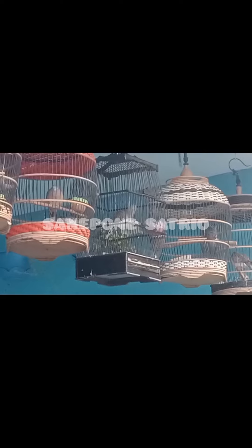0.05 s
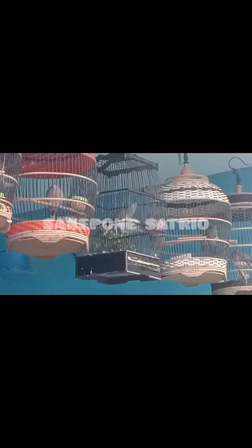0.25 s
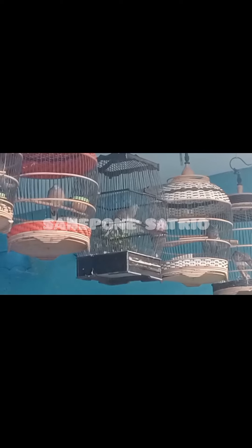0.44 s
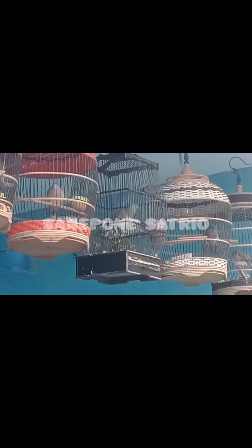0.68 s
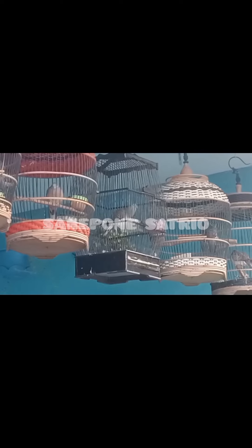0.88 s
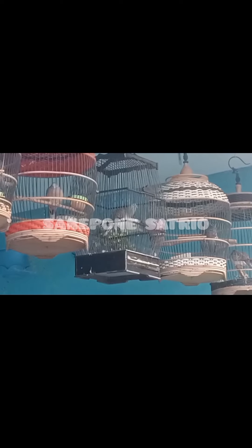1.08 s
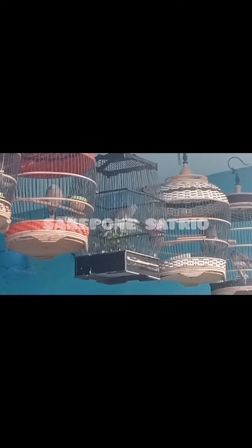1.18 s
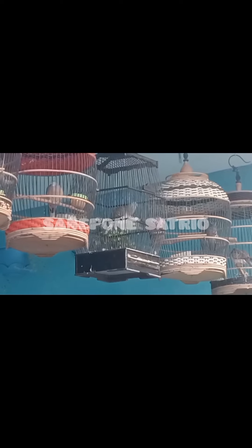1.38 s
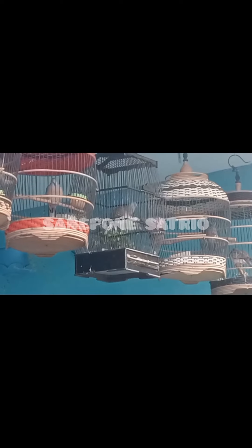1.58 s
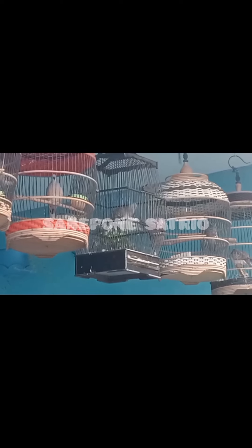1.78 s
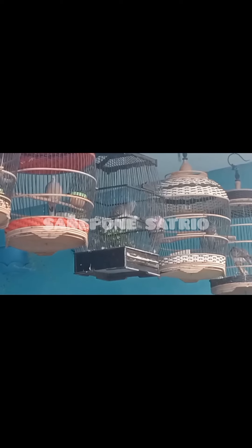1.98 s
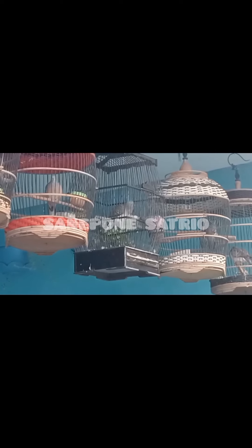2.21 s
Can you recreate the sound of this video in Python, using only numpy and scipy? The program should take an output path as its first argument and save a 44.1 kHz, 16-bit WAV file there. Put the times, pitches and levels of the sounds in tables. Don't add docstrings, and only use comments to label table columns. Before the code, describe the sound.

A bright claw tick opens at 0 s. From 0.2 to 0.95 s a caged dove sings a rapid phrase of about nine pure, fluty notes near 1200 Hz, scooped from below; the last are faint. Walls echo it. Soft low hoots from farther doves continue underneath. Faint, reverberant sparrow chirps come near 0, 1 and 2 s; a tick at 1.2 s, slight feather rustles, steady air hiss, low traffic hum.

```python
import sys
import numpy as np
from scipy import signal
from scipy.io import wavfile

SR = 44100
rng = np.random.default_rng(int(sys.argv[2]) if len(sys.argv) > 2 else 0)


def unload_audio(sound):
    columns = np.transpose(np.atleast_2d(sound))
    steps = np.round(np.clip(columns, -1, 1) * 32767)
    wavfile.write(sys.argv[1], SR, steps.astype(np.int16))


def volts(x):
    e = np.asarray(x, float) / 20
    return 10 ** e


N = 99225

# frequency in Hz, density in dB per Hz.
AIR_SPECTRUM = [(220, -51), (380, -1.5), (764, -6), (838, -15), (935, -9), (1690, -7), (4690, -15),
                (7590, -12), (15500, -33)]
# frequency in Hz, density in dB per Hz.
TRAFFIC_SPECTRUM = [(15, -67), (25, -11), (130, 1), (270, -8.5), (332, -2), (360, -16.5), (400, -20),
                    (520, -67), (880, -120)]
# start in seconds, peak level in dB.
PERCH_TICKS = [
    (.0031, -22.5),
    (.7705, -49.5),
    (1.1715, -29),
    (1.254, -44),
]
# middle in seconds, length in seconds, level in dB,
# low edge in Hz, high edge in Hz.
FEATHER_RUSTLES = [(.01, 0.035, -60, 3300, 8600), (0.19, 0.029, -51.5, 980, 1650),
                   (0.381, 0.037, -56.5, 1300, 1700), (0.802, 0.088, -69, 8140, 8700),
                   (.92, 0.44, -65, 7140, 7620), (1.037, 0.081, -65.5, 4870, 6400),
                   (1, 0.057, -70, 6500, 15000), (1.34, .03, -75, 9920, 14900),
                   (1.423, 0.057, -61.5, 1570, 2130), (2.028, 0.097, -64, 1350, 1840),
                   (2.043, 0.11, -56.5, 4650, 9300), (0, 0.091, -76, 9000, 14000),
                   (2.164, 0.16, -70, 6960, 7500), (2.24, .04, -58.5, 4167, 10000)]
# start in seconds, length in seconds, first pitch in Hz, last pitch in Hz, level in dB.
FAR_HOOTS = [(0.192, 0.078, 590, 606, -54), (0.369, 0.042, 600, 607, -66), (.51, 0.045, 630, 698, -58.5),
             (0.598, .2, 603, 595.2, -56.5), (.82, 0.059, 660, 634, -64.5), (0.861, 0.113, 598, 618, -57),
             (0.999, 0.054, 660, 650, -60), (1.063, 0.061, 615, 603, -54.5), (1.159, 0.17, 560, 546.4, -59),
             (1.343, 0.086, 595, 610, -58.5), (1.129, 0.165, 366, 359.7, -64),
             (0.835, 0.054, 480, 487, -57.5), (1.004, 0.062, 475, 499, -61.5),
             (2.219, 0.081, 610, 596, -60)]
# start in seconds, level in dB.
SPARROW_CHIRPS = [
    (-.07, -62),
    (1.02, -59),
    (1.986, -58.5),
]
# start in seconds, length in seconds, peak pitch in Hz, level in dB,
# place of the peak from 0 to 1.
WHISTLES = [
    (0.207, 0.11, 1270, -26.5, 0.57),
    (.343, 0.035, 1202, -24.5, 0.37),
    (0.405, .03, 1177, -23, 0.8),
    (0.472, 0.024, 1161, -24, 0),
    (0.549, 0.0343, 1198, -24.5, 0.6),
    (.652, 0.083, 1211, -26, 0.3),
    (0.779, 0.0975, 1192, -30.5, 0.42),
    (0.891, 0.03, 1133, -38, .3),
    (0.927, 0.033, 1190, -42.5, 0.58),
]
# start in seconds, length
# in seconds, pitch reached in Hz, level in dB.
LOW_SCOOPS = [(0.191, 0.034, 965, -29.5), (0.297, .036, 1225, -27), (0.365, 0.056, 970, -33),
              (0.397, 0.025, 990, -31), (0.437, 0.012, 1200, -25), (0.442, 0.012, 960, -39.5),
              (0.465, .02, 975, -37.5), (0.496, 0.046, 1080, -29.5), (0.537, 0.035, 985, -35.5),
              (0.634, 0.027, 975, -31), (.753, 0.019, 985, -30.5), (.781, 0.033, 990, -39),
              (0.876, 0.068, 1050, -45.5), (0.93, 0.037, 1060, -53.5)]
# multiple of the pitch, level in dB.
WHISTLE_OVERTONES = [(3, -58), (4, -38), (5, -44), (5.5, -48.5), (7, -48), (9, -57), (10, -57)]
# centre in Hz, width in Hz, gain in dB.
BEAK_RESONANCES = [(3800, 90, 18), (4626, 90, 7.5), (5960, 240, 3), (11540, 130, 10.5)]


def rms_one(x):
    return x / np.sqrt(np.mean(x ** 2) + 1e-20)


def drift(rate_hz):
    r = np.exp(-80 * np.pi * rate_hz / SR)
    white = rng.standard_normal(N // 40 + 2002)
    slow = signal.lfilter([1], [1, -2 * r, r * r], white)[2000:]
    return np.interp(np.arange(N) / 40, np.arange(len(slow)), rms_one(slow))


def gate(start_s, length_s, attack_s, release_s):
    t = np.arange(N) / SR - start_s
    rise = np.clip(np.minimum(t / attack_s, (length_s - t) / release_s), 0, 1)
    return np.sin(rise * np.pi / 2) ** 2, t


def tone(hz, multiple=1):
    return np.sqrt(2) * np.sin(2 * np.pi * multiple * np.cumsum(hz) / SR)


def band(x, low_hz, high_hz):
    edges_hz = [low_hz, min(high_hz, 0.45 * SR)]
    return signal.sosfilt(signal.butter(2, edges_hz, "band", fs=SR, output="sos"), x)


def top_cut(x):
    return signal.sosfilt(signal.ellip(10, 0.5, 60, 15600, fs=SR, output="sos"), x)


def coloured(spectrum, patchy_db):
    hz, db = np.transpose(spectrum)
    white = rng.standard_normal((2, N + SR))
    edges_hz = 25 * 2 ** np.arange(0, 9.5, 1 / 3)
    out = 0
    for k, (low_hz, high_hz) in enumerate(zip(edges_hz, edges_hz[1:])):
        level_db = np.interp(np.log(low_hz * high_hz) / 2, np.log(hz), db, left=-90)
        flicker_db = patchy_db * drift(8.2)
        out = out + volts(level_db + flicker_db) * band(white[k % 2], low_hz, high_hz)[SR:]
    return rms_one(out)


def yard(x, wet_db, decay_share=1):
    early_db, early_t60_s, late_t60_s, wall_cut_hz = 12, 0.5, 0.89, 6600
    t = np.arange(SR) / SR
    early = volts(early_db - 60 * t / early_t60_s)
    late = volts(-60 * t / late_t60_s)
    decay = (early + late) ** (1 / decay_share)
    echo = rng.standard_normal(SR) * decay * (t > 0.004)
    echo = echo / np.sqrt(np.sum(echo ** 2))
    dull = np.exp(-2 * np.pi * wall_cut_hz / SR)
    echo = signal.lfilter([1 - dull], [1, -dull], echo)
    return x + volts(wet_db) * signal.fftconvolve(x, echo)[:N]


def background():
    air_db, traffic_db, insect_db = -57.5, -54.5, -85
    air = volts(air_db) * coloured(AIR_SPECTRUM, patchy_db=0.8)
    traffic = volts(traffic_db) * coloured(TRAFFIC_SPECTRUM, patchy_db=3.5)
    insects = volts(insect_db) * rms_one(band(rng.standard_normal(N), 13250, 13750))
    low_cut = signal.butter(2, 68, "high", fs=SR, output="sos")
    return top_cut(signal.sosfilt(low_cut, air + traffic + insects))


def perch_ticks():
    t60_s, top_db = 0.0044, -3
    white, t = rng.standard_normal(N), np.arange(N) / SR
    bursts = np.full(N, 1e-18)
    for start_s, db in PERCH_TICKS:
        decay_db = -60 * np.maximum(t - start_s, 0) / t60_s
        bursts = bursts + volts(db + decay_db) * (t >= start_s) * white
    return band(bursts, 3950, 10000) + volts(top_db) * band(bursts, 14000, 16400)


def feather_rustles():
    white, t = top_cut(rng.standard_normal(N)), np.arange(N) / SR
    out = 0
    for middle_s, length_s, db, low_hz, high_hz in FEATHER_RUSTLES:
        swell = np.exp(-(2 * (t - middle_s) / length_s) ** 4)
        out = out + volts(db) * swell * rms_one(band(white, low_hz, high_hz))
    return out


def far_doves():
    edge_s, wet_db = 0.014, -1
    out = 0
    for start_s, length_s, first_hz, last_hz, db in FAR_HOOTS:
        shape, t = gate(start_s, length_s, edge_s, edge_s)
        hz = first_hz + (last_hz - first_hz) * np.clip(t / length_s, 0, 1)
        out = out + volts(db) * shape * tone(hz)
    return yard(out, wet_db)


def sparrow():
    chirp_s, low_hz, swing_hz, end_drop_hz = 0.075, 3750, 650, 120
    trill_per_s, trill_hz, jitter_hz = 170, 380, 120
    wet_db, decay_share = 13, 0.7
    out = np.zeros(3 * N)
    for start_s, db in SPARROW_CHIRPS:
        shape, t = gate(0, chirp_s, 0.016, 0.035)
        u = np.clip(t / chirp_s, 0, 1)
        trill = trill_hz * np.sin(2 * np.pi * trill_per_s * t) + jitter_hz * drift(60)
        arch = np.sin(np.pi * u ** 0.605)
        hz = low_hz - end_drop_hz * u + arch * (swing_hz + trill)
        at = N + int(start_s * SR)
        out[at:at + N] += yard(volts(db) * shape * tone(hz), wet_db, decay_share)
    return out[N:2 * N]


def dove_scoops():
    edge_s, depth_hz, rise_s, throat_hz, throat_width_hz = 0.008, 304.9, 0.0061, 960, 145
    out = 0
    for start_s, length_s, top_hz, db in LOW_SCOOPS:
        shape, t = gate(start_s, length_s, edge_s, edge_s)
        hz = top_hz - depth_hz * np.exp(-np.maximum(t, 0) / rise_s)
        below = np.minimum(hz - throat_hz, 0) / throat_width_hz
        out = out + volts(db) * shape * tone(hz) / (1 + below ** 2) ** 2
    return out


def dove_whistles():
    entry_hz, exit_hz, edge_s, fade_db_per_s = 1135.4, 1119, 0.011, 16
    octave_db, flutter_db, overtone_flutter_db = -30.5, 1.5, 5
    body, bright = 0, np.zeros(N)
    flutter = volts(flutter_db * drift(47))
    overtones = [(k, db + overtone_flutter_db * drift(25)) for k, db in WHISTLE_OVERTONES]
    for start_s, length_s, peak_hz, db, place in WHISTLES:
        shape, t = gate(start_s, length_s, edge_s, edge_s)
        shape = shape * volts(-fade_db_per_s * np.clip(t, 0, length_s))
        u = np.clip(t / length_s, 0, 1) - place
        rise_hz = (peak_hz - entry_hz) * (u / max(place, 1e-9)) ** 2
        fall_hz = (peak_hz - exit_hz) * (u / (1 - place)) ** 2
        hz = peak_hz - np.where(u < 0, rise_hz, fall_hz)
        body = body + volts(db) * shape * (flutter * tone(hz) + volts(octave_db) * tone(hz, 2))
        on = shape > 0
        for multiple, level_db in overtones:
            k = round(2 * multiple) / 2
            lift_db = 0
            for at_hz, width_hz, gain_db in BEAK_RESONANCES:
                lift_db = lift_db + gain_db * np.exp(-((k * hz[on] - at_hz) / width_hz) ** 2)
            bright[on] += volts(db + level_db[on] + lift_db) * shape[on] * tone(hz[on], k)
    return body, bright


def dove():
    body, bright = dove_whistles()
    return yard(body + dove_scoops(), wet_db=-1) + yard(bright, wet_db=-9.5)


def scene():
    cages = perch_ticks() + feather_rustles()
    return (background() + cages + far_doves() + sparrow() + dove())[None]


def band_limit(x):
    return signal.sosfilt(signal.butter(12, 16660, fs=SR, output="sos"), x)


def record(dry):
    return band_limit(dry)


dry = scene()
out = record(dry)
unload_audio(out)
```